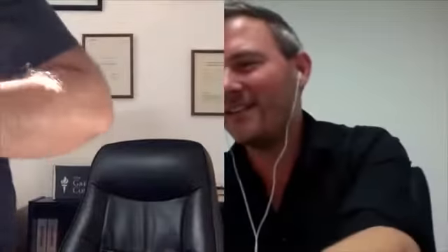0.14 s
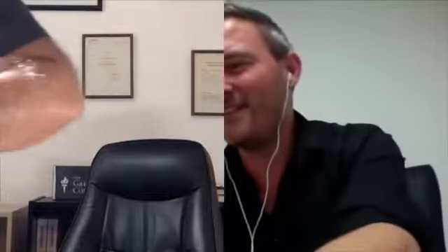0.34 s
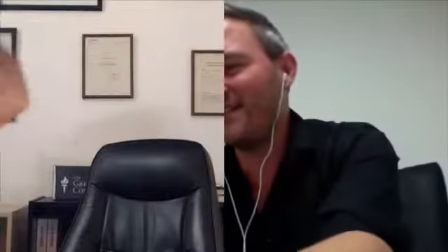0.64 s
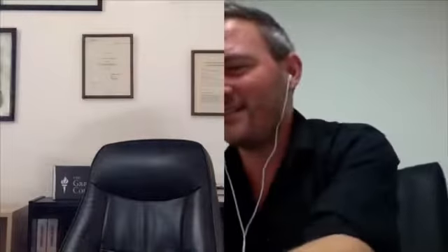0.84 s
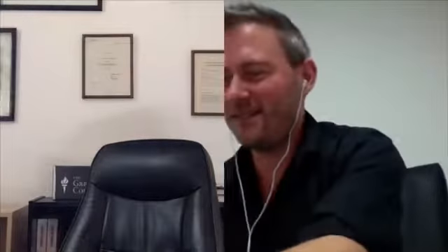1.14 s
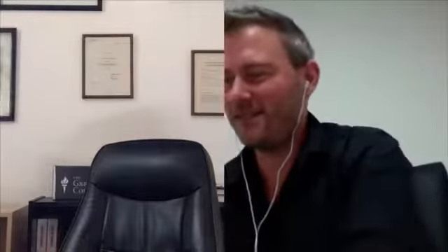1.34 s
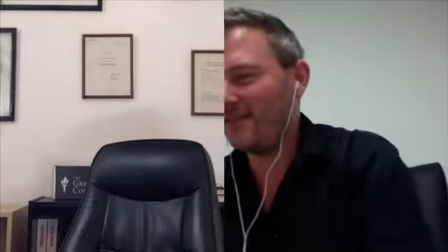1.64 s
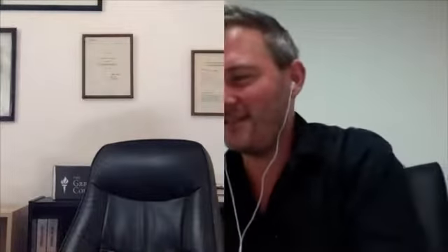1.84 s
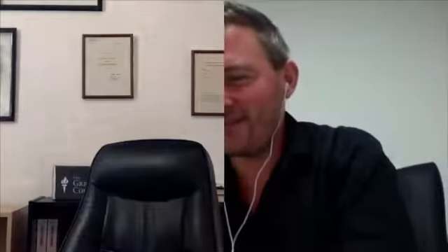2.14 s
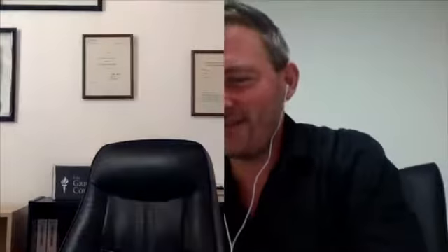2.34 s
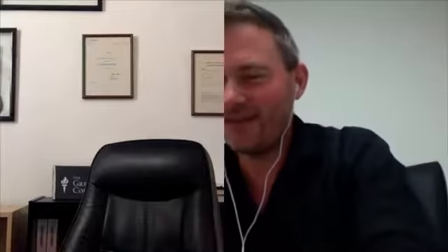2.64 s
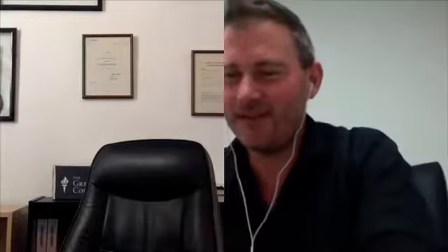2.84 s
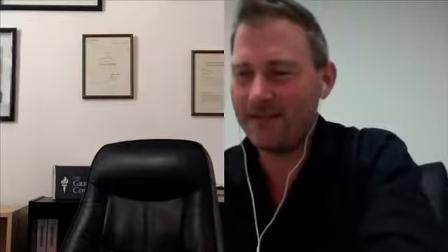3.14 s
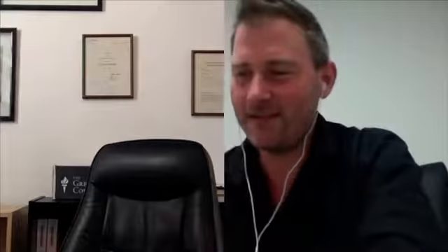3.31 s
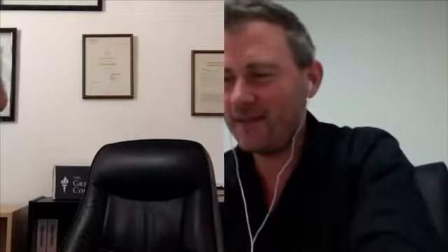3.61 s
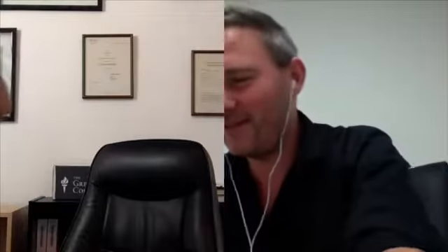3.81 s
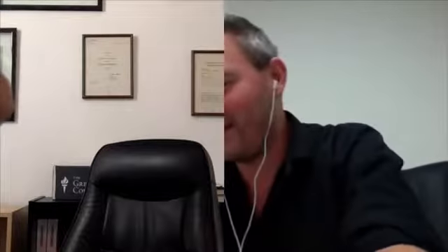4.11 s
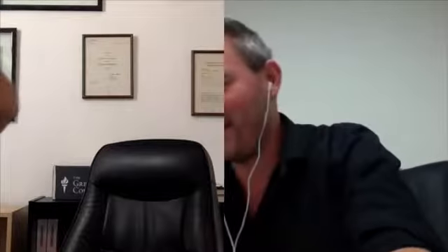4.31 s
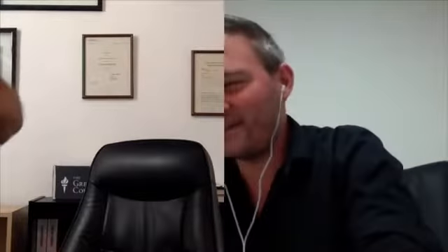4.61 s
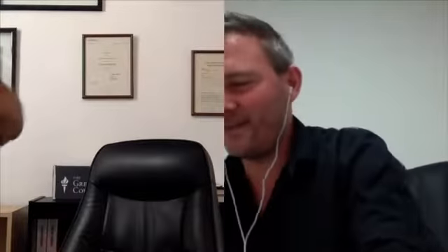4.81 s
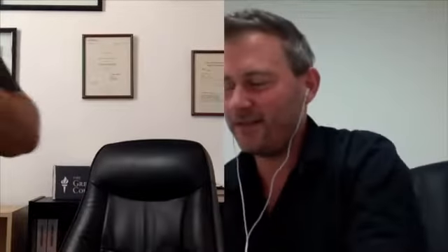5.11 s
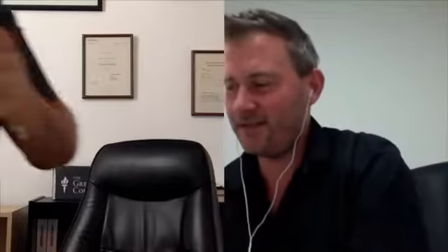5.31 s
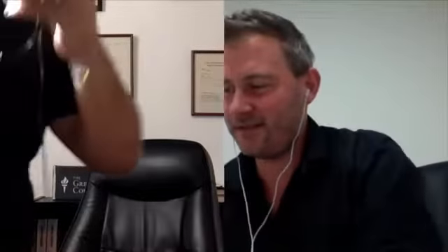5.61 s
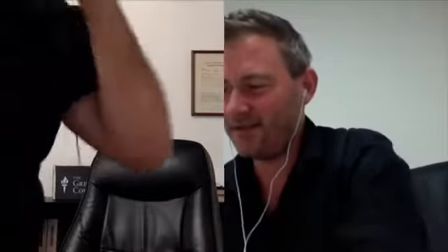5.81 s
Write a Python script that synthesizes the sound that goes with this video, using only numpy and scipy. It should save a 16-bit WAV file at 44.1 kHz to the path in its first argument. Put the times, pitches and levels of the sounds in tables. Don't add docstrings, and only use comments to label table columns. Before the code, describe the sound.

Plastic slats rustle, scrape and clatter in uneven bursts, with dull low knocks of the bottom rail underneath. Midway, a loud clack is followed by a cord dragging with climbing pitch, then a crisp snap that fizzles out. The longest rattling comes afterward, fading to faint scrapes and high bead ticks. Close and dry, mostly dulled on top as over a call, with some brighter airy details and a weak unsteady buzz.

```python
import sys
import numpy as np
from scipy import signal
from scipy.fft import rfft, irfft, next_fast_len
from scipy.io import wavfile
from scipy.ndimage import uniform_filter1d

SR = 44100
rng = np.random.default_rng(int(sys.argv[2]) if len(sys.argv) > 2 else 0)


def decibels_to_gain(level_db):
    exponent = np.asarray(level_db, float) / 20
    return 10 ** exponent


def store_wav(level_fs):
    pcm = np.round(np.clip(np.atleast_2d(level_fs), -1, 1) * 32767)
    wavfile.write(sys.argv[1], SR, pcm.T.astype(np.int16))


N = 262878

LINK_HZ, TOP_HZ = 11780, 15900
# start in seconds, peak level in dB, shine in dB, air in dB,
# decay time t60 in seconds.
NEAR_TICKS = [(0.042, -45, -26, -9.5, 0.076), (0.113, -38.5, -0.5, -9.5, 0.17), (1.698, -40, 4, 6, 0.22),
              (2.6256, -15, -28.5, -27, 0.061), (2.6318, -26, -21, -25.5, 0.1),
              (2.6463, -19, -21, -24.5, 0.17), (2.7064, -33, -23, -16.5, 0.27),
              (3.2765, -27.5, -35, -28, 0.24), (3.5064, -41, -12, -12.5, 0.28),
              (4.7351, -23.5, -8, -30, 0.19), (5.014, -47.5, -4, -2, 0.11), (5.0616, -45, -10, -4, 0.17),
              (5.0748, -45, 5, -8, 0.11), (5.4037, -48.5, -4, -25.5, 0.18), (5.4264, -45.5, 1, -16, 0.32),
              (5.46, -45.5, -1, -17, 0.35), (5.5104, -45, -2, -12.5, 0.31), (5.9489, -61, 5, 3, 0.09)]


def unit(x):
    return x / np.sqrt(np.mean(x ** 2) + 1e-20)


def along(points, hz):
    f, v = np.transpose(points)
    octaves_below = np.clip(np.log2(f[0] / (hz + 1)), 0, 9)
    return np.interp(np.log(hz + 1), np.log(f + 1), v) - 30 * octaves_below


def timed_gain(rows):
    s, db = np.transpose(rows)
    return decibels_to_gain(np.interp(np.arange(N) / SR, s, db, -150, -150))


def filtered(x, response):
    m = next_fast_len(x.shape[-1] + 8192)
    return irfft(rfft(x, m) * response(np.fft.rfftfreq(m, 1 / SR)), m)[..., :x.shape[-1]]


def peak(f, hz, width_hz):
    return 1j * f * width_hz / (hz * hz - f * f + 1j * f * width_hz)


def modes(table):
    return lambda f: sum((-1) ** k * decibels_to_gain(db) * peak(f, hz, w) for k, (hz, w, db) in enumerate(table))


def softened(x, corner_hz, damping, order):
    return filtered(x, lambda f: 1 / (1 - (f / corner_hz) ** 2 + damping * 1j * f / corner_hz) ** order)


def random_field(shape, bins, frames):
    across_hz = uniform_filter1d(rng.standard_normal(shape), size=bins, axis=0)
    return uniform_filter1d(across_hz, size=frames, axis=1)


def patchy(x, patchy_db):
    z = signal.stft(x, nperseg=256)[2]
    gain = decibels_to_gain(patchy_db * unit(random_field(z.shape, bins=4, frames=6)))
    return signal.istft(z * gain, nperseg=256)[1][:N]


def friction(per_s, spread_db, smooth):
    chance, side, size = rng.random((3, N))
    slips = (chance < per_s / SR) * np.sign(side - .5) * decibels_to_gain(-spread_db * np.log(size + 0.00062))
    return unit(slips) + smooth * rng.standard_normal(N)


def bursts(t60, spike, bend):
    t = np.arange(SR // 5) / SR
    t60 = np.clip(t60, .01, .6)[:, None]
    noise, luck = rng.standard_normal((2, len(t60), len(t)))
    bounces = decibels_to_gain(3.5 * unit(uniform_filter1d(luck, size=150, axis=1)))
    onset = 1 - np.exp(-t / 0.00091)
    rattle = onset * decibels_to_gain(-60 * (t / t60) ** bend) * bounces * noise
    return rattle + spike * (t == 0)


def placed(times, db, sounds):
    out = np.zeros(N + SR)
    for s, level_db, sound in zip(times, db, sounds):
        out[round(s * SR):][:len(sound)] += decibels_to_gain(level_db) * sound / np.abs(sound).max()
    return out[:N]


def rings(s, db, hz, t60, q, broad, wide, spike, bend):
    hz = hz[:, None]
    body = lambda f: (peak(f, hz, hz / q) + broad) * peak(f, hz, wide * hz) ** 4
    return placed(s - .0006, db, filtered(bursts(t60, spike, bend), body))


def lasting(rows, *same):
    return [(*row, *same) for row in rows]


def strokes(s, hold, first_db, last_db, rise, fall):
    t = np.arange(N) / SR - s[:, None]
    hold = np.abs(hold)[:, None] + 1e-3
    held = first_db[:, None] + (last_db - first_db)[:, None] * np.clip(t / hold, 0, 1)
    return decibels_to_gain(held + rise * np.minimum(t, 0) - fall * np.maximum(t - hold, 0)).sum(0)


def room(x):
    # frequency in Hz, decay time t60 in seconds.
    decay_times = [(200, 0.34), (2000, 0.076), (10000, 0.67)]
    hz, t, z = signal.stft(rng.standard_normal(SR // 2), SR, nperseg=256)
    t60 = np.interp(hz, *np.transpose(decay_times))
    tail = signal.istft(z * decibels_to_gain(-60 * t / t60[:, None]), SR, nperseg=256)[1]
    return signal.fftconvolve(np.pad(x, (300, 0)), tail / np.linalg.norm(tail))[:N]


def quiet():
    # frequency in Hz, density in dB per Hz.
    floor_shape = [(15, -40.5), (25, -11.5), (200, 2.5), (350, -1), (818, -8), (3800, -14.5), (5880, -16.5),
                   (16000, -22.5)]
    return decibels_to_gain(-73) * unit(filtered(rng.standard_normal(N), lambda f: decibels_to_gain(along(floor_shape, f))))


def rubbing():
    # frequency in Hz, density in dB per Hz.
    rail_shape = [(88, -52.5), (150, -11), (307, -5.5), (550, -10.5), (720, -34.5), (1210, -120)]
    frame_shape = [(320, -26), (550, -12.5), (921, -3), (1060, -11.5), (1400, -12.5), (1820, -39.5),
                   (3080, -120)]
    slat_shape = [(820, -33), (1400, -0.5), (1810, 4.5), (2710, 1), (2930, 0.5), (3800, -4.5), (4940, -11),
                  (8360, -120)]
    fizz_shape = [(2240, -48), (3800, -15), (6700, -9.5), (7380, -12.5), (9250, -15), (11200, -21.5),
                  (12000, -36.5), (15600, -41.5), (22000, -120)]
    # start in seconds, hold in seconds, level in dB,
    # extra weight on frame and rail in dB.
    twists = [(0.0, 0.15, -63.5, 3), (0.387, 0.13, -52, -4.5), (0.532, 0.035, -49, -5),
              (0.859, 0.044, -39.5, -18.5), (0.968, 0.058, -41, -5.5), (1.115, 0.023, -49.5, -15),
              (1.254, 0.068, -84, 9.5), (1.707, 0.18, -72, -3), (1.989, 0.034, -49.5, -6.5),
              (3.336, 0.052, -57.5, -3), (3.471, 0.034, -57.5, -4.5), (3.611, 0.056, -96, 33.5),
              (3.782, 0.15, -49, -2.5), (3.947, 0.3, -41, -6), (4.32, 0.09, -40, -2),
              (4.58, 0.11, -42, -11), (4.734, 0.056, -38, -5.5), (4.847, 0.15, -64.5, 2),
              (5.068, 0.2, -63.5, -5), (5.419, 0.15, -63, 3), (5.57, 0.29, -67, -6)]
    # start in seconds, hold in seconds, first and last level in dB.
    pulls = [
        (0.024, 0.23, -77, -78),
        (0.496, 0.39, -59.5, -45),
        (0.913, 0.066, -45, -40.5),
        (1.017, 0.038, -72, -67),
        (1.75, 0.039, -59, -75),
        (3.183, 0.12, -76.5, -86),
        (3.917, 0.28, -56, -40.5),
        (4.593, 0.19, -49.5, -39.5),
        (5.01, 0.097, -78, -69),
    ]
    slips = friction(per_s=3500, spread_db=1.7, smooth=.9)
    s, hold, db, weight_db = np.transpose(twists)
    slats = strokes(s, hold, db, db, rise=403, fall=261)
    frame = strokes(s, hold, db + weight_db, db + weight_db, rise=403, fall=261)
    rail = decibels_to_gain(-14 - 50) * (frame / decibels_to_gain(-50.0)) ** 0.5
    cord = strokes(*np.transpose(pulls), rise=261.5, fall=239.5)
    fizz = decibels_to_gain(-28) * slats + cord
    out = np.zeros(N)
    for shape, gain in ((rail_shape, rail), (frame_shape, frame), (slat_shape, slats), (fizz_shape, fizz)):
        out += gain * unit(filtered(patchy(slips, patchy_db=2.3), lambda f: decibels_to_gain(along(shape, f))))
    return out


def slaps():
    # start in seconds, peak level in dB, centre in Hz, decay time t60 in seconds.
    slap_rows = [(.005, -54, 262, 0.5), (0.867, -55, 77, 0.13), (1.134, -47, 203, 0.22),
                 (1.841, -59.5, 190, 0.29), (1.955, -23, 2450, 0.055), (1.964, -10, 2680, 0.021),
                 (1.970, -16, 2430, 0.062), (1.976, -20, 2070, 0.046), (3.333, -43, 2500, .03),
                 (3.403, -42.5, 586, 0.027), (3.479, -35, 3100, 0.032), (3.493, -47, 2500, .02),
                 (3.55, -33.5, 3600, .025), (4.214, -29, 3040, .025), (4.383, -36, 2500, .02),
                 (4.5630, -29, 2100, 0.012), (4.618, -23, 2200, 0.098), (4.636, -21, 2000, .02),
                 (4.789, -29, 1510, 0.023), (4.876, -29.5, 3000, 0.11), (0.231, -55, 2520, 0.22),
                 (.53, -33, 736, 0.051), (1.70, -39.5, 2870, 0.31), (1.956, -31.5, 820, 0.12),
                 (1.965, -22, 1610, 0.1), (3.9775, -27, 2660, .015), (5.232, -51, 3500, .015),
                 (5.763, -33.5, 316, 0.063), (5.798, -46, 2000, .02)]
    hit = rings(*np.transpose(slap_rows), q=3, broad=1.2, wide=2.2, spike=14, bend=1)
    return softened(hit, 4800, damping=1.3, order=4)


def clacks():
    # start in seconds, peak level in dB, ring in Hz, decay time t60 in seconds.
    edge_blows = [(0.371, -33.5, 2634, 0.17), (0.4453, -36, 2950, 0.071), (0.523, -38, 2840, 0.067),
                  (0.5584, -37, 2490, 0.14), (0.858, -32, 2630, 0.03), (0.8674, -24, 3750, 0.063),
                  (0.948, -22.5, 2800, 0.022), (0.9523, -10.5, 2934, 0.034), (0.9574, -21, 2710, 0.037),
                  (0.962, -14.5, 2970, 0.037), (0.9824, -23, 2156, 0.021), (0.9862, -29.5, 3700, 0.052),
                  (1.1139, -25, 2844, 0.042), (1.1527, -38, 2430, 0.032), (1.955, -24.5, 2780, 0.1),
                  (1.9638, -23, 3110, 0.048), (1.9552, -30.5, 4010, 0.04), (3.6432, -33.5, 2946, 0.091),
                  (3.6705, -37, 2780, 0.044), (3.7618, -31.5, 2675, 0.07), (3.939, -32, 2180, 0.032),
                  (3.978, -22.5, 2735, 0.077), (4.2094, -34, 2540, 0.061), (4.3306, -26, 2200, 0.15),
                  (4.3423, -29, 3970, 0.078), (4.3594, -34, 3400, 0.073), (4.5625, -37, 2120, 0.023),
                  (4.6289, -39, 2360, 0.08), (4.7287, -36, 3420, 0.22), (4.7874, -35, 3340, 0.17)]
    low_taps = [(0.229, -35.5, 1380, 0.32), (0.242, -32, 2040, 0.36), (0.527, -23, 690, 0.14),
                (0.031, -43, 560, 0.3), (0.8687, -18.5, 1660, 0.053), (0.949, -23, 1630, 0.12),
                (0.982, -14.5, 2100, 0.049), (1.115, -22.5, 935, 0.026), (1.122, -27.5, 874, 0.2),
                (1.953, -27, 1120, 0.17), (1.964, -23.5, 1980, 0.18), (2.163, -35.5, 1990, 0.23),
                (2.575, -44, 1100, 0.51), (2.624, -36.5, 1810, 0.35), (3.275, -42.5, 1600, 0.058),
                (3.451, -38.5, 664, 0.23), (3.544, -40.5, 640, 0.12), (3.165, -39, 1860, 0.19),
                (5.796, -44, 1680, 0.26), (3.828, -31, 1510, 0.53), (3.846, -25, 886, 0.28),
                (4.036, -27, 820, 0.75), (4.328, -26, 2140, 0.3), (4.339, -17.5, 1090, 0.11),
                (4.381, -19.5, 1760, 0.067), (4.4, -27, 1440, 0.14), (4.556, -41, 665, 0.59),
                (4.584, -33, 1420, 0.21), (4.629, -19.5, 1770, 0.11), (5.413, -47, 970, 0.5)]
    # start in seconds, peak level in dB, ring in Hz.
    brushes = [(0.2279, -43, 3470), (0.3994, -51, 2750), (1.6254, -39.5, 2810), (1.666, -51, 2910),
               (1.6955, -36.5, 3870), (3.275, -37.5, 3060), (3.8067, -43, 2700), (4.01, -31, 2500),
               (5.1966, -47.5, 2880), (5.4585, -53, 3800), (5.5782, -59, 1900), (5.69, -58, 1500)]
    nudges = [(0.57, -35, 1640), (0.645, -44, 1820), (0.102, -51, 1010), (0.388, -42.5, 786),
              (1.155, -53, 870), (1.574, -57, 2130), (1.624, -42, 774), (1.699, -42.5, 1940),
              (2.295, -49.5, 1048), (3.676, -46, 1377), (3.333, -52, 2000), (3.391, -50, 1020),
              (3.477, -44.5, 970), (3.644, -34, 1700), (3.94, -46, 2190), (4.292, -33, 2000),
              (5.073, -44.5, 1765), (5.438, -48, 1246), (5.548, -51, 1830), (3.73, -52, 690)]
    high = rings(*np.transpose(edge_blows), q=24, broad=.18, wide=0.7, spike=11, bend=1.5)
    low = rings(*np.transpose(low_taps), q=5.2, broad=0.6, wide=3.0, spike=8.6, bend=0.94)
    touches = lasting(brushes, 0.11) + lasting(nudges, 0.13)
    light = rings(*np.transpose(touches), q=14, broad=.3, wide=.7, spike=14, bend=.9)
    return softened(high + low + light, 4500, damping=1.3, order=2)


def edge_ticks():
    # start in seconds, peak level in dB, ring in Hz, shine in dB, decay time t60 in seconds.
    far_ticks = [(0.229, -31, 4700, -14, 0.36), (0.868, -27, 5580, 5.5, 0.11),
                 (0.9817, -17.5, 6600, -7.5, 0.058), (0.986, -14, 5700, -6, 0.038),
                 (1.114, -34, 4440, -36.5, 0.077), (1.806, -56.5, 6110, 3.5, 0.12),
                 (1.954, -52.5, 4000, -51, 0.1), (3.1669, -37.5, 5190, -44.5, 0.31),
                 (3.455, -44, 5480, 2.5, 0.11), (3.548, -36, 6440, 1.5, 0.069),
                 (3.696, -46, 5460, -28, 0.21), (3.749, -47.5, 5060, -2.5, 0.82),
                 (3.825, -30.5, 5300, -8, 0.42), (4.036, -29, 4970, -10.5, 0.96),
                 (4.3297, -21, 5240, -10.5, 0.22), (4.345, -35.5, 5230, 9, 0.14), (4.574, -30, 5400, -5, 1),
                 (4.629, -21, 5200, -12, 0.068)]
    # 16 Hz per dB, 5 kHz at -52 dB
    near = [(s, db, 5000 + 16 * (db + 52), shine_db, t60) for s, db, shine_db, _, t60 in NEAR_TICKS]
    s, db, hz, shine_db, t60 = np.transpose(far_ticks + near)
    ring = rings(s, db, hz, t60, q=3.2, broad=0.88, wide=1.1, spike=12.7, bend=1.0)
    shine = filtered(bursts(0.41 * t60, spike=11, bend=1.0), lambda f: peak(f, 9800, 5400) ** 3)
    return ring + placed(s - .001, db + shine_db, shine)


def tick_air():
    s, db, _, air_db, t60 = np.transpose(NEAR_TICKS)
    above_link = lambda f: np.clip((f - LINK_HZ) / 500 + 1, 0, 1)
    air = filtered(bursts(0.39 * t60, spike=9, bend=1.6), lambda f: peak(f, 14000, 4000) ** 3 * above_link(f))
    return placed(s - .001, db + air_db, air)


def catches():
    # start in seconds, peak level in dB, centre in Hz, decay time t60 in seconds.
    catch_rows = [(.1115, -63, 2940, .04), (.447, -46, 1600, .04), (.556, -34, 1540, 0.12),
                  (.583, -37, 624, 0.046), (1.625, -48, 2320, 0.069), (1.666, -50, 2830, .03),
                  (1.696, -45, 4840, 0.036), (1.726, -49, 2000, 0.072), (1.953, -44, 625, 0.05),
                  (1.9655, -46, 4300, 0.049), (1.976, -41, 4100, 0.067), (1.978, -35.5, 520, 0.037),
                  (2.003, -36, 2100, .08), (2.038, -45, 2000, 0.036), (3.508, -47, 3900, .04),
                  (3.8235, -32, 5000, .02), (3.848, -30.5, 1540, 0.054), (5.41, -51.5, 660, 0.27),
                  (5.46, -48, 1500, .1), (5.58, -53, 2800, .04), (5.797, -54, 2500, .015)]
    dry_contacts = rings(*np.transpose(catch_rows), q=5.7, broad=0.59, wide=1.1, spike=7, bend=0.99)
    return softened(dry_contacts, 5600, damping=1, order=2)


def knocks():
    # start in seconds, peak level in dB, centre in Hz.
    sill_blows = [(0.247, -47.5, 446), (0.397, -35, 435), (0.53, -30.5, 265), (0.868, -30, 480),
                  (0.953, -28.5, 507), (0.99, -31.5, 222), (1.04, -48, 117), (1.128, -45, 437),
                  (1.235, -47, 257.5), (1.64, -52.5, 243.4), (1.966, -36, 510), (2.428, -59, 398),
                  (2.575, -51, 407), (2.638, -49, 356), (4.345, -37, 333), (4.878, -32, 189),
                  (4.879, -34, 500), (5.764, -37, 420), (5.767, -42, 137), (5.779, -37, 480)]
    return rings(*np.transpose(lasting(sill_blows, 0.15)), q=4, broad=1.1, wide=1.8, spike=18, bend=1.1)


def hum():
    # start in seconds, hold in seconds, first and last level in dB.
    openings = [
        (0.3, 0.15, -70.5, -65.5),
        (0.84, 1.79, -70.5, -74.5),
        (3.36, 2.24, -71, -68),
    ]
    flutter = unit(filtered(rng.standard_normal(N), lambda f: peak(f, 120, 36) ** 2))
    gate = strokes(*np.transpose(openings), rise=82, fall=82)
    return gate * (.7 * np.sin(2 * np.pi * 120 * np.arange(N) / SR) + .5 * flutter)


def scrapes():
    # start in seconds, peak level in dB, ring in Hz, length in seconds.
    scrape_rows = [(0.392, -42, 2830, 0.061), (0.447, -39, 1630, 0.04), (.448, -45, 2480, 0.045),
                   (0.476, -43, 780, 0.035), (0.486, -43, 2000, 0.064), (.524, -33.5, 2180, 0.041),
                   (0.545, -30.5, 2830, 0.084), (0.549, -49, 3400, 0.045), (0.571, -39.5, 388, 0.023),
                   (0.611, -41, 1870, 0.1), (3.36, -45.5, 2060, 0.024), (3.415, -57, 2750, .02),
                   (3.453, -54, 3680, 0.023), (3.49, -44, 1810, 0.068), (3.507, -50, 3740, .018),
                   (3.532, -48, 810, 0.026), (3.563, -55, 554, 0.068), (1.724, -54, 1910, 0.15),
                   (3.802, -35.5, 2870, 0.041), (3.823, -30, 766, 0.03), (3.824, -27.5, 1820, 0.018),
                   (3.86, -35, 1650, .03), (3.888, -38, 935, .07), (3.936, -30, 2300, 0.024),
                   (3.983, -24.5, 2850, .04), (4.547, -42, 675, 0.19), (4.568, -40, 2620, 0.024),
                   (4.595, -35, 1420, 0.1), (4.652, -32, 2200, 0.078), (4.678, -31.5, 5370, 0.1),
                   (4.737, -41, 2160, 0.14), (4.768, -36, 3500, 0.036), (4.859, -39, 2560, 0.023),
                   (5.39, -53, 1020, 0.071), (5.457, -49, 1120, 0.048), (5.503, -40, 1940, .075),
                   (5.574, -51, 2930, 0.064), (5.569, -56, 355, 0.13), (5.655, -50, 2940, 0.083),
                   (5.673, -52, 2000, 0.035), (5.722, -65, 2300, .04), (0.865, -29, 1665, 0.059),
                   (1.064, -37.5, 5360, 0.11), (1.11, -38, 3800, 0.01), (1.703, -50, 3880, 0.24),
                   (5.013, -51, 1670, 0.022), (5.071, -58, 4570, 0.11), (5.168, -56, 3200, .04),
                   (5.946, -58.5, 5830, .015), (1.799, -49.5, 5900, 0.084)]
    return rings(*np.transpose(scrape_rows), q=11, broad=.12, wide=.7, spike=3, bend=3)


def slide():
    # time in seconds, drag level in dB.
    drag_levels = [
        (1.93, -80),
        (2.02, -64.5),
        (2.136, -53),
        (2.338, -50),
        (2.414, -49),
        (2.566, -48.5),
        (2.64, -44.5),
        (2.72, -61),
        (2.79, -88),
    ]
    # time in seconds, pitch of the hollow in Hz.
    hollow_pitch = [
        (2, 1723),
        (2.13, 1757),
        (2.159, 2322),
        (2.25, 2817),
        (2.349, 3200),
        (2.451, 3515),
        (2.476, 3070),
        (2.55, 3660),
        (2.62, 3540),
    ]
    slips = patchy(friction(per_s=2000, spread_db=-1, smooth=1.2), patchy_db=1.2)
    pitch = np.interp(np.arange(N) / SR, *np.transpose(hollow_pitch))
    band = filtered(slips, lambda f: peak(f, 3000, 220) ** 2)
    glide = np.exp(2j * np.pi * np.cumsum(pitch - 3000) / SR)
    shifted = np.real(signal.hilbert(band) * glide)
    broad = unit(filtered(slips, lambda f: peak(f, 2500, 3500) ** 2))
    hollow = unit(patchy(unit(shifted), patchy_db=4.5) + 2.1 * broad)
    edge_modes = lambda f: peak(f, 4800, 3500) + 0.53 * peak(f, 10900, 4600)
    hiss_band = lambda f: np.clip((f - 2800) / 2000, 0, 1) * np.clip((12000 - f) / 200 + .5, 0, 1)
    hiss = unit(filtered(slips, lambda f: edge_modes(f) * hiss_band(f)))
    air = unit(filtered(slips, lambda f: np.clip((f - 12000) / 200 + .5, 0, 1)))
    drag = timed_gain(drag_levels)
    firm = (drag / decibels_to_gain(-48)) ** 0.28
    return drag * (decibels_to_gain(-2.5) * hollow + hiss + decibels_to_gain(1.3) * firm * air)


def snaps():
    # start in seconds, peak level in dB, centre in Hz, decay time t60 in seconds.
    clean_blows = [
        (2.6308, -15, 6100, .012),
        (3.8262, -27, 1800, .012),
        (3.9800, -21, 2900, .02),
        (4.3312, -21, 2100, .012),
        (4.5848, -23, 2000, .008),
    ]
    return rings(*np.transpose(clean_blows), q=6.4, broad=.6, wide=1.6, spike=25, bend=0.6)


def sizzle():
    # time in seconds, level in dB.
    chatter_levels = [
        (2.62, -90),
        (2.635, -36),
        (2.72, -40.5),
        (2.8, -56.5),
        (2.88, -66.5),
        (2.97, -72),
        (3.1, -76.5),
    ]
    # mode in Hz, width in Hz, level in dB.
    thin_modes = [(5430, 330, -1), (5980, 540, 4.5), (6310, 3100, -5.5)]
    chatter = patchy(friction(per_s=900, spread_db=2.5, smooth=.9), patchy_db=2.5)
    metal = modes(thin_modes)
    return timed_gain(chatter_levels) * unit(filtered(chatter, lambda f: metal(f) * peak(f, 3400, 2400)))


def pings():
    # start in seconds, peak level in dB.
    bead_hits = [
        (5.385, -54),
        (5.4047, -46.5),
        (5.4282, -42),
        (5.46, -44),
        (5.504, -46),
        (5.512, -39),
        (5.608, -58),
    ]
    hits = lasting(bead_hits, 5200, .02)
    return rings(*np.transpose(hits), q=4, broad=.8, wide=.6, spike=12, bend=1)


def link(f):
    return np.clip((LINK_HZ - f) / 400, 0, 1)


def starved(x, kept):
    z = signal.stft(x, nperseg=512)[2]
    field = random_field(z.shape, bins=8, frames=5)
    return signal.istft(z * (field < np.quantile(field, kept)), nperseg=512)[1][:N]


def loudness(x):
    return np.sqrt(np.abs(uniform_filter1d(x ** 2, size=4000, origin=1200)))


def ducked(floor, far):
    # start in seconds, hold in seconds, first and last level in dB.
    top_openings = [
        (0, .3, -3, -6),
        (1.15, .5, -12, -13),
        (1.704, 1.9, -3, 0),
        (4.997, 0.13, 0, -6),
        (5.398, 0.62, 0.5, 1),
    ]
    top = filtered(floor, lambda f: 1 - link(f))
    rumble = filtered(floor, lambda f: f < 110)
    bright = loudness(filtered(far, lambda f: f > 4000))
    middle = (floor - top - rumble) / (1 + (bright / decibels_to_gain(-50.0)) ** 2)
    gate = strokes(*np.transpose(top_openings), rise=299.6, fall=120)
    return rumble + middle + starved(top, kept=.7) * gate / (1 + (loudness(far) / decibels_to_gain(-49)) ** 2)


def scene():
    hits = clacks() + snaps() + knocks() + edge_ticks()
    dry_contacts = scrapes() + slaps() + pings() + catches()
    far = filtered(rubbing() + hits + decibels_to_gain(-18) * room(hits) + hum() + dry_contacts, link)
    air = tick_air()
    near = air + decibels_to_gain(-24) * room(air) + slide() + sizzle()
    return (far + near + ducked(quiet(), far))[None]


def roll_off(x):
    return signal.sosfilt(signal.butter(12, 16500, fs=SR, output="sos"), x)


def record(dry):
    mix = filtered(dry, lambda f: np.clip((TOP_HZ - f) / 200, 0, 1))
    return roll_off(mix)


dry = scene()
out = record(dry)
store_wav(out)
```